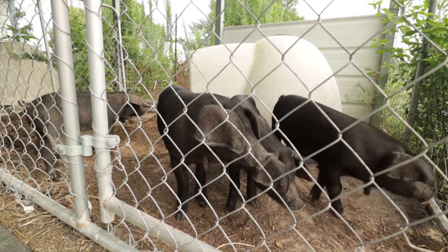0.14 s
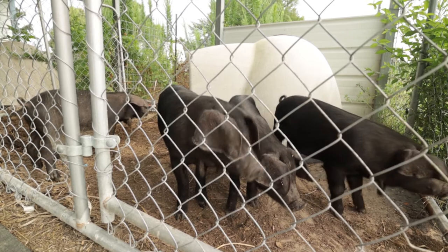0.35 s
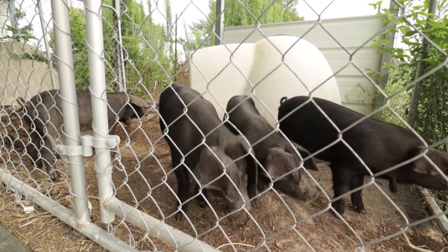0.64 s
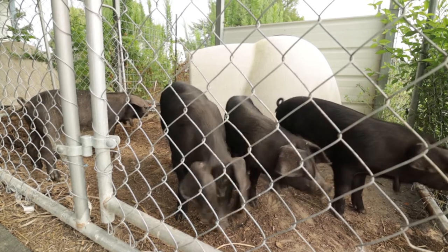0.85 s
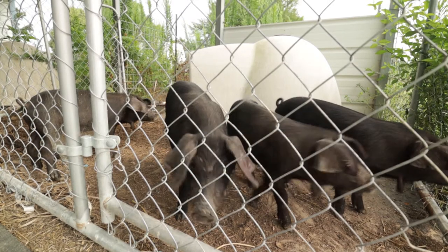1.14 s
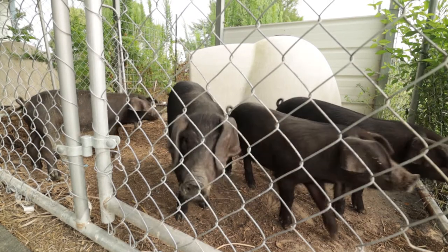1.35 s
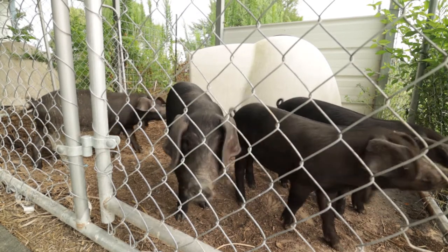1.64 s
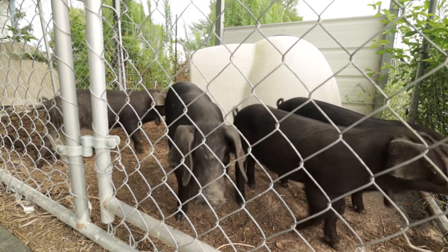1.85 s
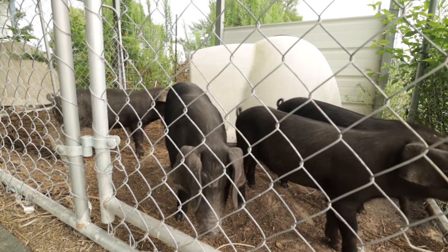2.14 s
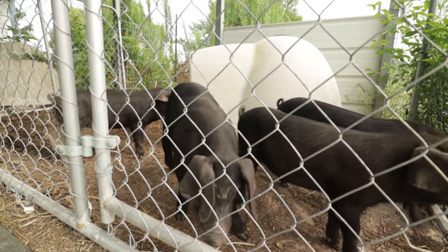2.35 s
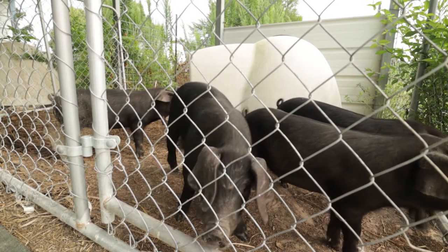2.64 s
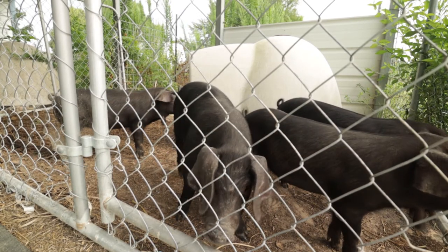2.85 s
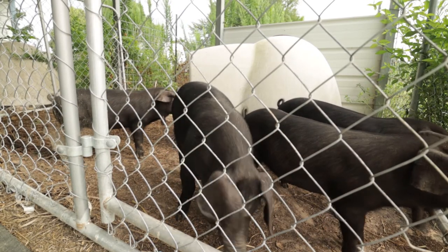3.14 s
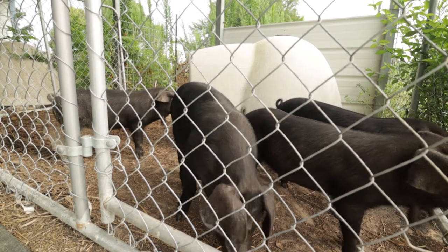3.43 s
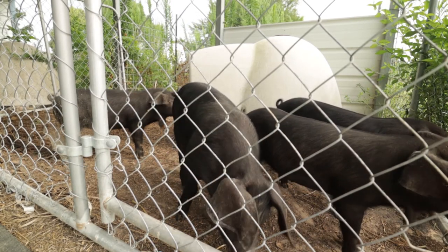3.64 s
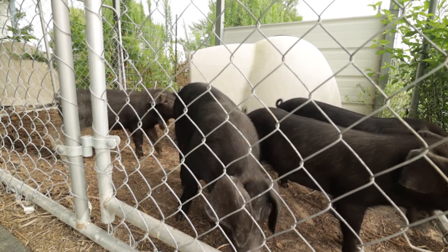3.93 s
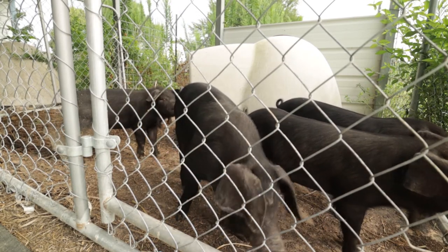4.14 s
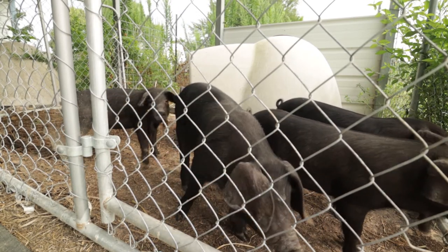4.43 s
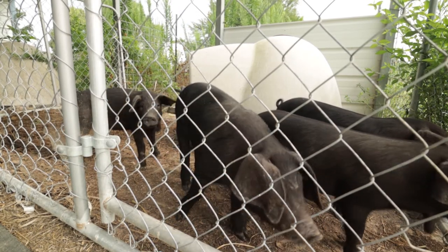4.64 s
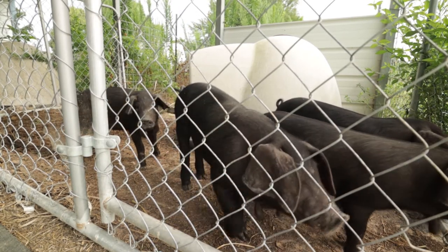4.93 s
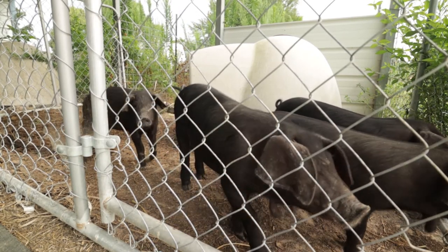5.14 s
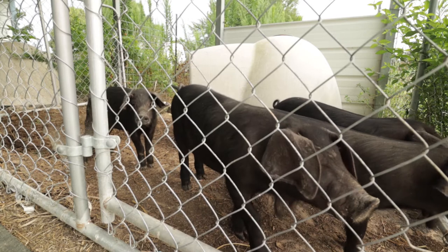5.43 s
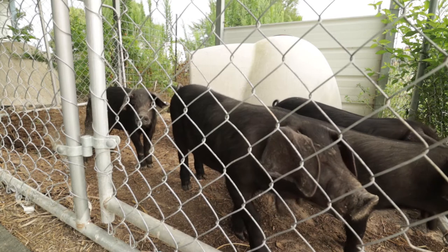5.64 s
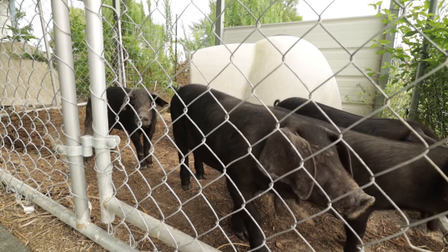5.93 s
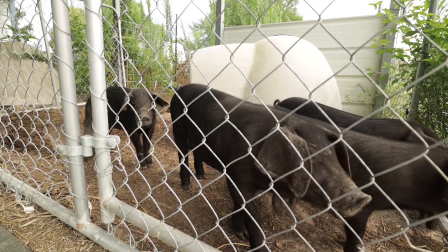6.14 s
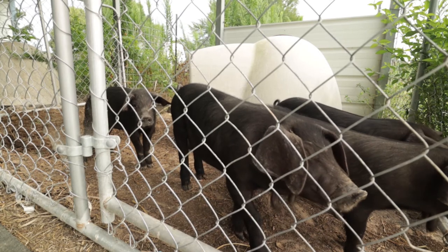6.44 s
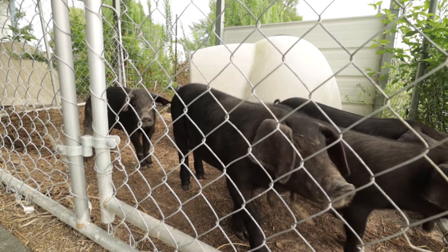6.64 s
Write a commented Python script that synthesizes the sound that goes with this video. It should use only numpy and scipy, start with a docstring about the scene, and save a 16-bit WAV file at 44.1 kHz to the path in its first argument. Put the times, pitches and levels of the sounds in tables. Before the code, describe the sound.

Close outdoor mono sound of pigs nosing through straw: low nasal snuffles, airy nostril hiss, dry crackle and dull thuds on soil. A bright metallic fence rattle bursts in early, with a weaker knock just before three seconds. Later come a heavier thud, low air bumps on the microphone and a crisp cluster of snaps. High cricket trills never stop over a faint low outdoor air noise, and distant birds whistle more near the end.

```python
"""Pigs snuffle and root in dry straw behind a chain-link fence on a summer day, before a single microphone.
From the start noise breaths swell through snout resonances, straw grains crackle, stalks snap as short rings
and hooves thud low; noise-band choruses and pulsed crickets chirr without pause, gliding tones whistle far off.
From 1.4 to 1.9 s, and once more at 2.8 s, a pig knocks the fence: decaying modes clang and wires jangle.
A heavier thud falls at 4 s, low puffs of air bump the microphone from 4.7 s, and birds gather after 6 s."""
import sys
import numpy as np
from scipy import signal
from scipy.fft import rfft, irfft
from scipy.io import wavfile

SR = 44100
rng = np.random.default_rng(int(sys.argv[2]) if len(sys.argv) > 2 else 0)


def volts_from_decibels(level):
    """Turn decibel levels (scalar or array-like) into linear amplitude factors."""
    exponent = np.asarray(level, float) / 20
    return 10 ** exponent


def file_out(sig):
    """Save sig as 16-bit WAV at sys.argv[1]."""
    # one column per channel
    cols = np.atleast_2d(sig).T
    # limit, then scale
    lim = np.clip(cols, -1, 1)
    pcm = np.round(lim * 32767).astype(np.int16)
    wavfile.write(sys.argv[1], SR, pcm)


N = 299575


def rms_one(x):
    """Scales a signal to rms 1."""
    return x / np.sqrt(np.mean(x ** 2) + 1e-20)


def in_time(rows):
    """Reads the columns of a table, whose first is seconds, at every sample."""
    s, *columns = np.transpose(rows)
    return [np.interp(np.arange(N) / SR, s, column) for column in columns]


def at_hz(points, hz):
    """Reads a table of (Hz, value) along log frequency."""
    table_hz, values = np.transpose(points)
    return np.interp(np.log(hz), np.log(table_hz), values)


def drift(rate_hz):
    """Random wander of rms 1: noise through a double-pole low-pass, drawn at every 40th sample."""
    r = np.exp(-2 * np.pi * rate_hz * 40 / SR)
    noise = rng.standard_normal(N // 40 + 2002)
    slow = signal.lfilter([1], [1, -2 * r, r * r], noise)[2000:]   # the filter has settled by then
    return np.interp(np.arange(N) / 40, np.arange(len(slow)), rms_one(slow))


def band(x, low_hz, high_hz):
    """Passes one band of frequencies."""
    edges_hz = [low_hz, min(high_hz, .45 * SR)]
    return signal.sosfilt(signal.butter(2, edges_hz, "band", fs=SR, output="sos"), x)


def resonate(x, hz, width_hz):
    """Two-pole resonance with gain 1 at the centre."""
    r = np.exp(-np.pi * width_hz / SR)
    feedback = [1, -2 * r * np.cos(2 * np.pi * hz / SR), r * r]
    return signal.lfilter(np.array([1, 0, -1]) * (1 - r * r) / 2, feedback, x)


def ring(clicks, hz, t60_s):
    """A unit click sets a decaying sine of starting height 1 ringing."""
    r, w = volts_from_decibels(-60 / (t60_s * SR)), 2 * np.pi * hz / SR
    return signal.lfilter([0, np.sin(w)], [1, -2 * r * np.cos(w), r * r], clicks + 1e-18)


def coloured(x, spectrum):
    """Imposes a smooth spectrum on a steady texture; rms 1."""
    hz = np.maximum(np.arange(N // 2 + 1) * SR / N, 1)
    return rms_one(irfft(rfft(x) * volts_from_decibels(at_hz(spectrum, hz)), N))


def grains(per_s, spread_db):
    """Random clicks of uneven size and either sign."""
    sizes = volts_from_decibels(spread_db * np.minimum(rng.exponential(1, N), 5)) * rng.choice([-1, 1], N)
    return sizes * (rng.random(N) < per_s / SR)


def swells(rows, edge):
    """Each row swells to its peak and fades; powers add, giving one gain curve per dB column."""
    t, power = np.arange(N) / SR, 0
    for s, rise_s, fall_s, *db in rows:
        away = np.where(t < s, (s - t) / max(rise_s, .003), (t - s) / max(fall_s, .003))
        # a higher edge gives a flatter top and more sudden ends
        power = power + np.outer(volts_from_decibels(np.array(db)) ** 2, np.exp(-2 * away ** edge))
    return np.sqrt(power)


def rooting():
    """Turbulent breath through snout and nostrils, fluttering; straw crackles under the push."""
    # Sniffs and snorts. Each row: peak in seconds, rise in s, fall in s,
    # low snuffle in dB, nostril hiss in dB, both before the flutter.
    sniffs = [(0.0, .05, 0.07, -60.5, -67), (.31, 0.11, 0.048, -59.5, -65), (.44, 0.018, 0.034, -55.5, -66),
              (.52, 0.052, 0.062, -61, -64), (.75, 0.031, 0.13, -55.5, -65), (.9, .04, .06, -60.5, -68),
              (.98, 0.0096, 0.02, -56.5, -73), (1.095, 0.048, 0.065, -57, -66),
              (1.186, 0.024, .015, -58.5, -78), (1.32, 0.048, 0.099, -62, -72),
              (1.96, 0.05, 0.16, -54, -58), (2.16, 0.065, 0.085, -63, -61.5),
              (2.39, 0.043, 0.053, -48, -52), (2.93, 0.042, .095, -51.5, -51.5),
              (3.075, .025, 0.063, -56.5, -68), (3.3, 0.051, 0.047, -53.5, -60.5),
              (3.91, 0.096, .06, -56.5, -76), (4.32, 0.061, 0.067, -53, -60.5),
              (4.8, 0.071, 0.085, -53.5, -59.5), (4.91, 0.046, .16, -59, -68),
              (5.21, 0.032, 0.021, -57, -58.5), (5.32, 0.052, 0.022, -65, -64),
              (5.43, 0.042, 0.039, -67, -62), (5.54, 0.082, 0.022, -64, -67), (5.88, .02, 0.011, -63, -70),
              (6.18, .06, 0.04, -63.5, -70)]
    # Straw pushed aside. Each row: peak in seconds, rise in s, fall in s, level in dB before the crackle wavers.
    rustles = [(.07, 0.16, 0.13, -57), (.29, .05, .05, -59), (.435, .035, .02, -61), (.52, .03, .07, -67),
               (.735, .02, .06, -70), (.94, .05, .03, -64), (1.09, .025, .03, -64),
               (2.39, 0.027, 0.041, -56.5), (2.785, .015, 0.028, -54), (2.94, .035, .065, -57),
               (3.22, .03, 0.038, -59), (3.33, .05, .025, -64), (3.42, .03, 0.026, -68),
               (3.95, 0.15, .05, -61), (4.05, 0.022, 0.043, -59), (4.32, .14, 0.23, -62),
               (4.84, .08, 0.11, -62), (5.07, 0.15, 0.042, -58.5), (5.21, 0.017, 0.044, -52)]
    # Quiet snuffling of the whole herd between sniffs. Each row: time in seconds,
    # low snuffle in dB, nostril hiss in dB, straw in dB, all before they waver.
    herd = [(0, -66, -62, -64), (.6, -66.5, -70, -82), (1.2, -66, -76, -76), (1.43, -67, -63, -67),
            (1.5, -73, -80, -85), (1.88, -70, -59, -82), (2.25, -66, -65.5, -80), (2.5, -67, -60, -70),
            (2.72, -67, -73.5, -63), (2.85, -64, -67, -80), (3.2, -66, -63.5, -74), (3.6, -73, -69, -64),
            (4.1, -70, -69.5, -70), (4.55, -69, -65.5, -73), (5.4, -73, -69.5, -63), (5.8, -73, -76.5, -80),
            (6.5, -72.5, -67, -80), (6.79, -69, -72, -83)]
    # Low resonances of the snout. Each row: centre in Hz, width in Hz, relative level in dB.
    snout = [(324, 215, 9.5), (710, 620, -5.5)]
    # Broad resonances of the nostrils. Each row: centre in Hz, width in Hz, relative level in dB.
    nostril = [(930, 450, -1.5), (1630, 1590, 0.5), (2700, 2520, 1), (4500, 4070, -4.5)]
    # Spectrum of the straw. Each row: frequency in Hz, relative density in dB per Hz.
    straw_spectrum = [(2500, -25.5), (5000, -8), (8000, 0.5), (12000, -8), (16000, -10)]
    usual_sniff_db, opening_db_per_db, herd_waver_db = -52, 1, 2.5

    herd_gains = [volts_from_decibels(db + herd_waver_db * drift(4.1)) for db in in_time(herd)]
    event_gains = np.vstack([swells(sniffs, edge=2.6), swells(rustles, edge=2.5)])
    low_gain, hiss_gain, straw_gain = np.hypot(herd_gains, event_gains)

    low_breath, nostril_breath = rng.standard_normal((2, N))
    lower, upper = [volts_from_decibels(db) * resonate(low_breath, hz, width) for hz, width, db in snout]
    # harder blowing lifts the upper snout resonance
    opening = (low_gain / volts_from_decibels(usual_sniff_db)) ** opening_db_per_db
    low = (lower + opening * upper) / np.std(lower + upper)
    low = low / np.maximum(opening, 1) ** .3   # holds back part of the added loudness

    hiss = np.zeros(N)
    for k, (hz, width, db) in enumerate(nostril):
        hiss += (-1) ** k * volts_from_decibels(db) * resonate(nostril_breath, hz, width)
    breath = volts_from_decibels(1.83 * drift(28)) * (low_gain * low + hiss_gain * rms_one(hiss))

    straw = coloured(grains(per_s=12000, spread_db=2.5), straw_spectrum)
    return breath + straw_gain * volts_from_decibels(2.7 * drift(25)) * straw


def fence(pipe_db=-24, mesh_db=-7, longest_s=0.93, spot_db=13):
    """Each blow rings the pipe modes and shakes the mesh, whose jangle dies faster in the treble."""
    # Blows and after-rattles. Each row: time in seconds, strength in dB, brightness in dB per octave,
    # ring length as a factor, frequency in Hz near which the struck spot favours the modes.
    hits = [(1.441, -36, -4.5, 1, 2380), (1.4836, -15, 4, 0.45, 2350), (1.495, -24, -1, 1, 2060),
            (1.549, -35, 0, 0.56, 1900), (1.584, -29.5, 3, 0.61, 2670), (1.68, -31.5, -3.5, 0.37, 930),
            (1.72, -38, -0.5, 0.42, 930), (1.768, -38, -2.5, 0.62, 5300), (1.861, -38, -1, 0.19, 1980),
            (2.777, -32, 0, 0.9, 2450)]
    # Ringing modes of the pipes. Each row: frequency in Hz, relative level in dB,
    # t60 in seconds before the longest-ring limit and the ring length factor.
    modes = [(917, -8.5, 0.32), (1365, -6, 0.94), (1642, -22, 0.27), (1830, -8, 0.99), (2144, -12, 0.34),
             (2037, -8, 0.57), (1970, -0.5, 0.33), (2418, -5.5, 0.43), (2340, -8, 0.3), (2790, -3, 0.27),
             (3800, -7, 0.49), (4400, -6.5, 0.54), (4760, -15, .4), (5630, -9, .2), (5920, 1.5, 0.14),
             (6800, -11, 0.25), (6560, 3, 0.36), (7200, -9, 0.25), (7370, -7, .25), (7700, 0.5, 0.3),
             (7900, -1.5, 0.4), (8716, -5, 0.17), (8948, -19, 0.12)]
    # Spectrum of the jangling wires. Each row: frequency in Hz, relative density in dB per Hz.
    mesh = [(180, -49), (300, -18), (678, -7), (828, -7.5), (915, -4), (1280, -7), (2070, -2), (2610, -4),
            (3640, -5), (3890, -6), (6200, -2.5), (7200, -2.5), (11300, -6), (13100, -2.5), (16000, -23)]
    # Decay of the wires. Each row: frequency in Hz, t60 in seconds before the ring length factor.
    mesh_t60 = [(400, 1), (1000, 1), (2000, 0.93), (4000, 0.71), (7000, 0.37), (12000, 0.088)]

    out, age = np.zeros(N), np.arange(SR) / SR
    edges = 300 * 2 ** np.arange(0, 6, 1 / 3)   # third-octave bands, Hz
    centres = np.sqrt(edges[1:] * edges[:-1])
    jangle = rms_one(grains(per_s=16000, spread_db=3.0))
    total = np.sqrt(np.sum(volts_from_decibels(at_hz(mesh, centres)) ** 2 * np.diff(edges)) / SR * 2)
    wires = []
    for low, high, hz in zip(edges, edges[1:], centres):
        wires.append(band(jangle, low, high) * volts_from_decibels(at_hz(mesh, hz)) / total)

    chance_db = rng.normal(0, 1.9, (len(hits), len(modes)))
    phases = rng.uniform(0, 2 * np.pi, (len(hits), len(modes)))
    rattle_db = [5.6 * drift(86) for _ in range(8)]   # loose wires damp and re-excite each mode

    for k, (s, hit_db, tilt, length, spot_hz) in enumerate(hits):
        at = int(s * SR)
        for wire, hz in zip(wires, centres):
            level = hit_db + mesh_db + tilt * np.log2(hz / 3000)
            fade = volts_from_decibels(level - 60 * age / (at_hz(mesh_t60, hz) * length))
            onset = 1 - np.exp(-age / 0.00078)
            out[at:at + SR] += wire[at:at + SR] * fade * onset
        for j, (hz, db, t60) in enumerate(modes):
            favour_db = spot_db * np.exp(-(np.log2(hz / spot_hz) / .1) ** 2)
            level = hit_db + pipe_db + favour_db + db + chance_db[k, j] + tilt * np.log2(hz / 3000)
            shaken = rattle_db[(j + k) % len(rattle_db)][at:at + SR]
            fade = volts_from_decibels(level + shaken - 60 * age / (min(t60, longest_s) * length))
            out[at:at + SR] += fade * np.sin(2 * np.pi * hz * age + phases[k, j])
    return out


def thuds(contact_s=0.0026, grit=0.29):
    """A soft push on packed soil: a low ring that builds over the contact, with a dull crunch."""
    # Hooves and snouts on soil. Each row: start in seconds, peak in dB, pitch in Hz, t60 in seconds.
    pushes = [(0.018, -45.5, 101, 0.052), (.45, -45, 103, 0.054), (0.791, -43, 152, 0.13),
              (.62, -51, 800, .03), (1.084, -44, 126.6, 0.18), (1.089, -41, 304, 0.057),
              (1.65, -42, 164, 0.048), (2.451, -36, 108, 0.078), (4.042, -30.5, 176.4, 0.061)]
    out, age = np.zeros(N), np.arange(SR // 4) / SR
    for s, db, hz, t60 in pushes:
        crunch = rms_one(band(rng.standard_normal(len(age)), hz * 0.66, hz * 1.5))
        tone = np.sin(2 * np.pi * hz * age) + .5 * np.sin(2 * np.pi * 2.19 * hz * age)
        build = 1 - np.exp(-(age / contact_s) ** 2)
        thud = build * volts_from_decibels(-60 * age / t60) * (tone + grit * crunch)
        at = int(s * SR)
        out[at:at + len(age)] += volts_from_decibels(db) * thud / np.abs(thud).max()
    return out


def snaps(cycles=38.0):
    """A stalk or wire ticks as a wide click with a short ring, its t60 at most the given cycles."""
    # Stalks snapping and wires ticking. Each row: start in seconds, peak in dB, centre in Hz,
    # t60 of the click in seconds.
    ticks = [(0.02, -58, 2500, .01), (.064, -48, 4060, .01), (.108, -38, 6400, .01),
             (0.123, -42, 4040, 0.013), (.144, -44, 4270, 0.017), (.164, -42, 6400, .01),
             (.434, -45, 6500, .015), (0.733, -45, 2420, 0.083), (0.734, -40.5, 7040, .06),
             (.977, -47.5, 1880, 0.022), (1.089, -48, 1550, 0.024), (1.351, -49, 2160, 0.017),
             (1.464, -35.5, 3150, 0.012), (1.79, -36, 5460, 0.011), (1.916, -35, 1930, 0.025),
             (1.9155, -31, 8400, 0.018), (3.095, -47, 3000, 0.0095), (3.108, -35.5, 2900, 0.0021),
             (3.5, -44, 5930, 0.0089), (3.498, -52, 2000, .015), (4.029, -34.5, 11400, .01),
             (4.725, -49, 2200, 0.011), (5.1715, -35, 8900, 0.011), (5.178, -44, 12500, .01),
             (5.1972, -25.5, 8300, 0.0082), (5.2016, -29.5, 8400, 0.023), (5.207, -35, 6350, 0.04),
             (5.2117, -35.5, 4830, 0.041), (5.2184, -42, 7500, .03), (5.43, -50, 1280, .05)]
    size = 4000
    out, age = np.zeros(N + size), np.arange(size) / SR
    for s, db, hz, t60 in ticks:
        click = band(rng.standard_normal(size) * volts_from_decibels(-60 * age / t60), hz / 2.8, hz * 1.48)
        tone = np.sin(2 * np.pi * hz * age) * volts_from_decibels(-60 * age / min(t60, cycles / hz))
        burst = click + 1.37 * tone
        at = int(s * SR)
        out[at:at + size] += volts_from_decibels(db) * burst / np.abs(burst).max()
    return out[:N]


def birds(echo_db=-9):
    """Glides through three pitches; rough calls flutter in level and pitch; trees smear them."""
    # Far whistles. Each row: start in seconds, end in seconds, start pitch in Hz, middle pitch in Hz,
    # end pitch in Hz, level in dB before tremble and flutter.
    calls = [(0, 0.064, 2770, 2520, 2400, -61), (0.063, 0.109, 3880, 3420, 3240, -56),
             (0.369, 0.395, 3050, 3020, 3040, -62), (2.624, 2.706, 2040, 2340, 2980, -60),
             (2.71, 2.753, 2800, 2700, 2650, -67), (3.123, 3.197, 2045, 2370, 2860, -58),
             (3.255, 3.3, 2390, 2750, 3300, -63), (3.324, 3.441, 2950, 2650, 2300, -62),
             (3.42, 3.502, 2660, 2660, 2680, -68), (3.44, 3.514, 2140, 2150, 2160, -67),
             (3.493, 3.588, 4700, 3820, 3180, -61), (4.838, 4.869, 6800, 7640, 7700, -44),
             (4.987, 5.065, 3000, 3000, 3100, -66), (5.12, 5.18, 3250, 3220, 3210, -66),
             (5.995, 6.111, 2110, 2390, 2810, -69.5), (6.14, 6.22, 5900, 5900, 5900, -59.5),
             (6.31, 6.357, 4300, 4650, 5560, -61), (6.34, 6.41, 5760, 5850, 5800, -54),
             (6.41, 6.496, 2050, 2100, 2300, -62.5), (6.466, 6.543, 4500, 4620, 4670, -63),
             (6.47, 6.522, 2440, 2700, 2820, -58), (6.514, 6.56, 3570, 3740, 3880, -59.5),
             (6.552, 6.706, 3960, 4000, 3920, -60), (6.653, 6.768, 1974, 2100, 2360, -58.5),
             (6.7, 6.755, 694, 848, 960, -64.5), (6.707, 6.772, 4400, 4700, 4700, -59),
             (6.721, 6.78, 2420, 2570, 2500, -58.5), (6.746, 6.797, 3460, 3800, 3950, -59)]
    rough_held, rough_per_octave_per_s = 0.28, 0.058   # fast glides sound rougher
    out, tremble = np.zeros(N), volts_from_decibels(1.9 * drift(37))
    flutter_in, flutter_across = drift(170), drift(180)   # in phase and a quarter turn away
    for start, end, first_hz, middle_hz, last_hz, db in calls:
        a, b = max(int(start * SR), 0), min(int(end * SR), N)
        u = np.linspace(0, 1, b - a)
        glide = abs(np.log2(last_hz / first_hz)) / (end - start)   # octaves per s
        rough = np.clip(rough_held + rough_per_octave_per_s * glide, 0, 1)
        pitch_hz = np.polyval(np.polyfit([0, .5, 1], [first_hz, middle_hz, last_hz], 2), u)
        turn = 2 * np.pi * np.cumsum(pitch_hz) / SR
        voice = (1 - rough + rough * flutter_in[a:b]) * np.sin(turn)
        voice += rough * flutter_across[a:b] * np.cos(turn)
        out[a:b] += volts_from_decibels(db) * np.sin(np.pi * u) ** 0.19 * voice
    age = np.arange(SR // 5) / SR
    echoes = rms_one(rng.standard_normal(len(age)) * volts_from_decibels(-60 * age / 0.48)) / np.sqrt(len(age))
    return out * tremble + volts_from_decibels(echo_db) * signal.fftconvolve(out, echoes)[:N]


def insects():
    """Far choruses are steep noise bands; near crickets scrape bursts of wing strokes at a near-steady rate."""
    # Far choruses, too many voices to tell apart. Each row: centre in Hz, width in Hz,
    # level in dB before it wavers, waver in dB.
    chorus = [(4400, 460, -67, 1), (5900, 510, -68, 1), (8400, 680, -64, 3), (9240, 580, -56.5, 0.94),
              (9815, 430, -64, 0.7)]
    # Near trilling crickets. Each row: ringing pitch in Hz, pulses per second, t60 in seconds,
    # level in dB before it wavers.
    crickets = [(7820, 42.6, 0.042, -63.5), (7700, 61.0, 0.078, -62), (7494, 90, 0.034, -66.5)]
    out = np.zeros(N)
    for hz, width, db, waver_db in chorus:
        stage_width = width * 1.27   # two stages in a row narrow the band again
        voices = resonate(resonate(rng.standard_normal(N), hz, stage_width), hz, stage_width)
        out += volts_from_decibels(db + waver_db * drift(4.0)) * rms_one(voices)
    for hz, per_s, t60, db in crickets:
        pulse_turn = np.cumsum(per_s * (1 + 0.01737 * drift(1.144))) / SR
        pulses = np.clip(np.sin(2 * np.pi * pulse_turn), 0, 1)
        tone = np.sin(2 * np.pi * np.cumsum(hz * (1 + 0.0077 * drift(16))) / SR)
        stroke = pulses * (tone + 4.4 * rng.standard_normal(N))
        out += volts_from_decibels(db + 1.6 * drift(5)) * rms_one(ring(stroke, hz, t60))
    return out


def puffs():
    """Puffs of air bump the microphone as swells of very low noise."""
    # Each row: peak in seconds, rise in s, fall in s, level in dB.
    gusts = [(4.72, .04, 0.073, -44.5), (5.275, 0.034, 0.021, -46.5), (6.19, .07, .07, -68),
             (6.49, .08, 0.13, -65), (6.755, .06, .04, -68)]
    return swells(gusts, edge=2)[0] * rms_one(band(rng.standard_normal(N), 33.7, 52))


def open_air():
    """The open air around the microphone: steady noise, strongest in the bass, wavering a little in level."""
    # Spectrum of the air. Each row: frequency in Hz, relative density in dB per Hz.
    air_spectrum = [(15, -25), (30, -7.5), (60, -1), (110, 1.5), (220, -2.5), (330, -13), (600, -12.5),
                    (1300, -17), (3000, -19.5), (7000, -18), (11500, -24.5), (16000, -19.5)]
    return volts_from_decibels(-59 + 0.62 * drift(4.6)) * coloured(rng.standard_normal(N), air_spectrum)


def amplifier_hiss():
    """Each channel's amplifier adds a faint hiss of its own."""
    # Spectrum of the hiss. Each row: frequency in Hz, relative density in dB per Hz.
    hiss_spectrum = [(60, -22), (200, -11), (500, -4.5), (1000, -9.5), (3000, -9.5), (8000, -23.5),
                     (12500, -10.5), (16000, -10.5)]
    return volts_from_decibels(-80) * np.array([coloured(noise, hiss_spectrum) for noise in rng.standard_normal((2, N))])


def scene():
    """Everything reaches one microphone, which feeds both channels alike."""
    mix = rooting() + fence() + thuds() + snaps() + birds() + insects() + puffs() + open_air()
    return np.array([mix, mix])


def band_limit(x):
    """A steep low-pass at the top of the band."""
    return signal.sosfilt(signal.butter(12, 16520, fs=SR, output="sos"), x)


def record(dry):
    """Amplifier hiss joins the microphone signal and a steep low-pass cuts the top."""
    low_pass = signal.cheby2(16, 45, 15950, fs=SR, output="sos")   # order, dB down, from this Hz up
    mix = signal.sosfilt(low_pass, dry + amplifier_hiss())
    return band_limit(mix)


dry = scene()
out = record(dry)
file_out(out)
```